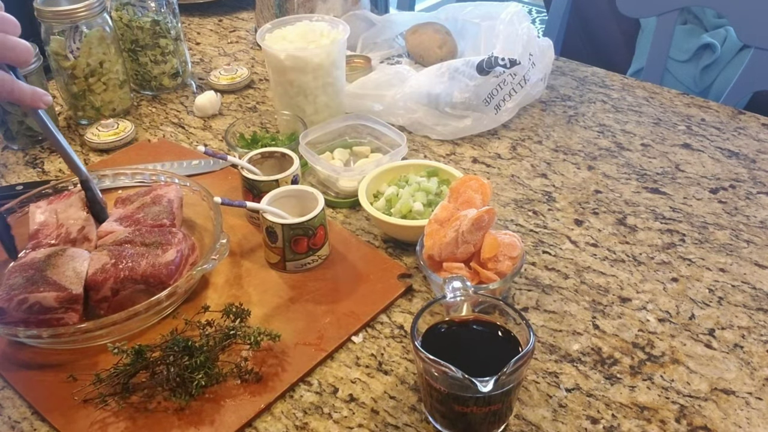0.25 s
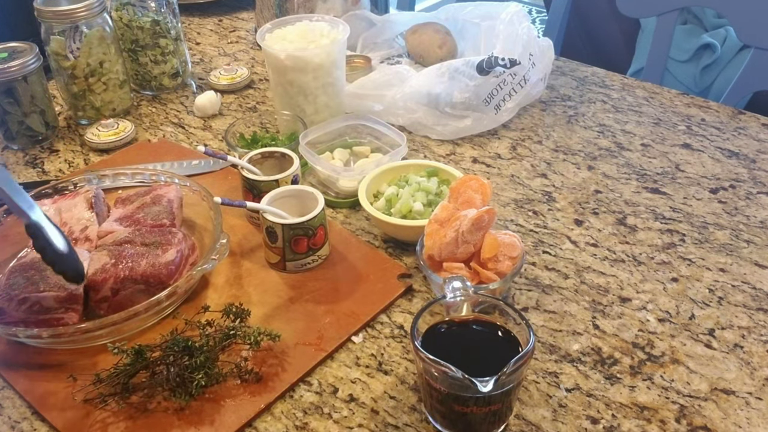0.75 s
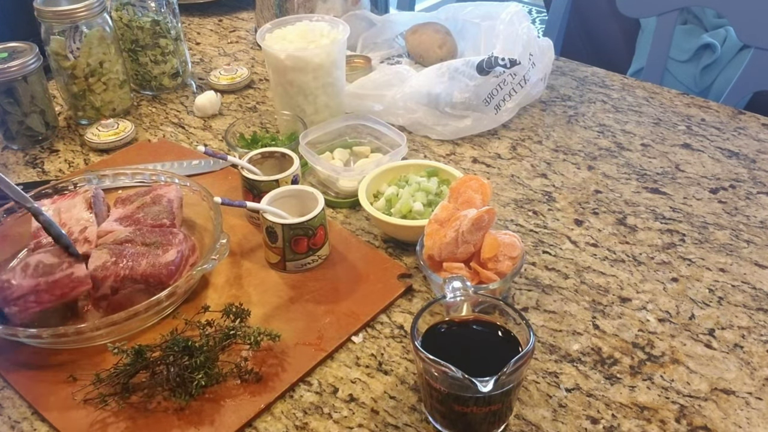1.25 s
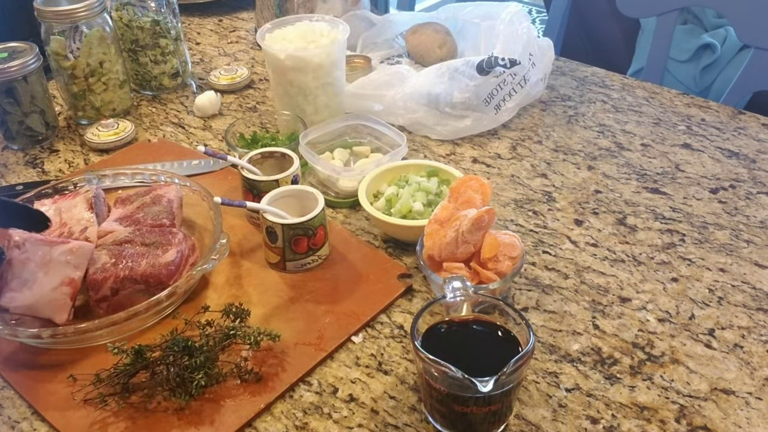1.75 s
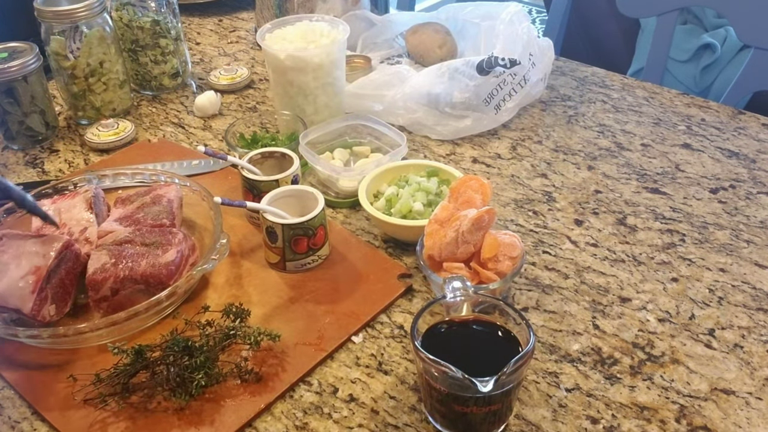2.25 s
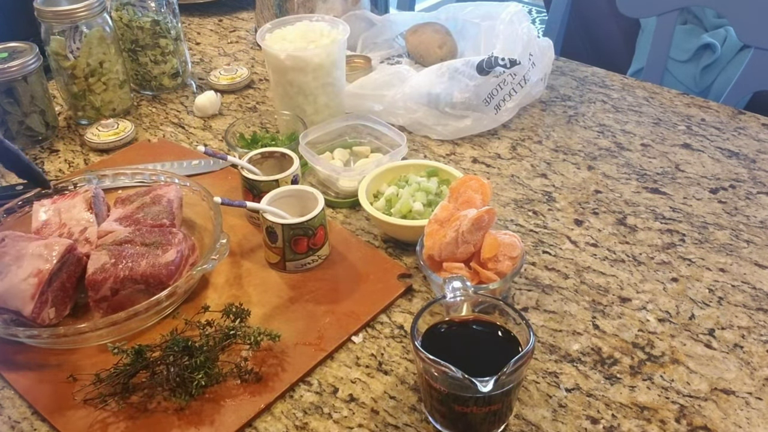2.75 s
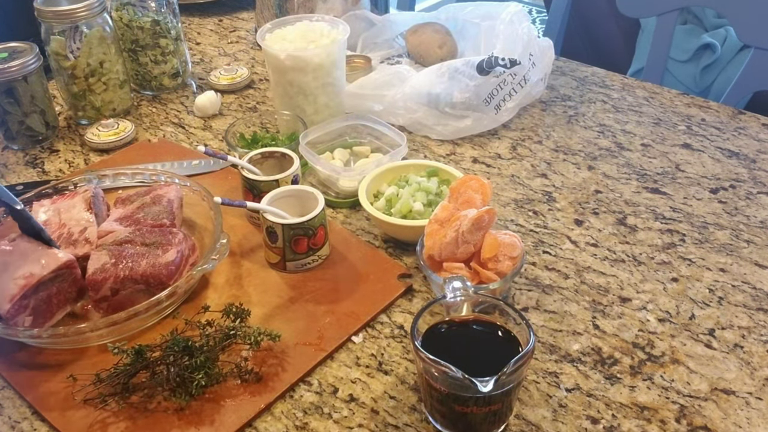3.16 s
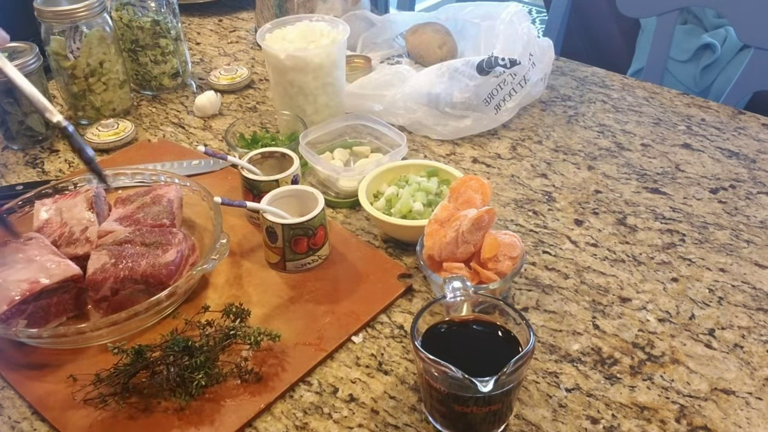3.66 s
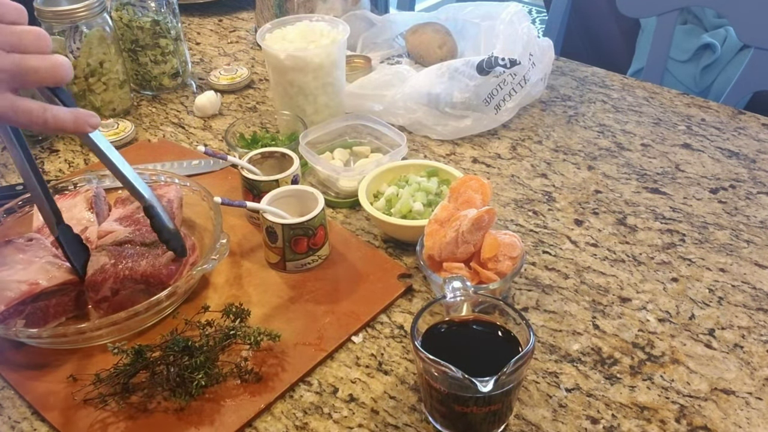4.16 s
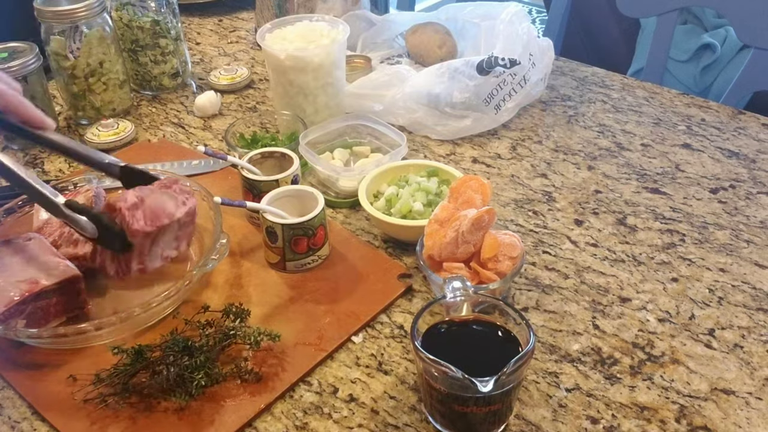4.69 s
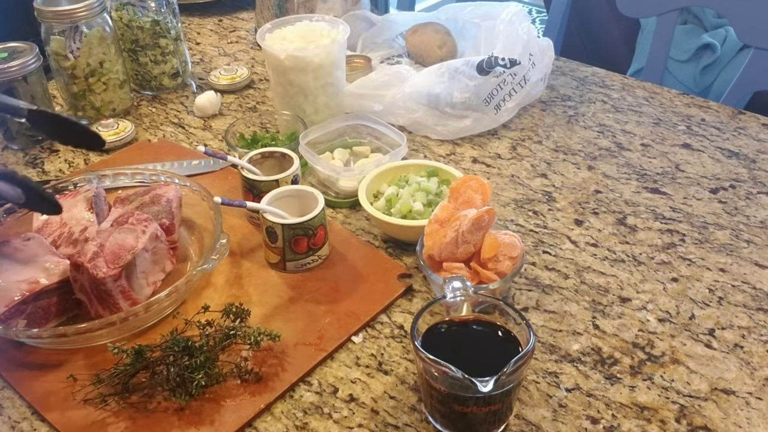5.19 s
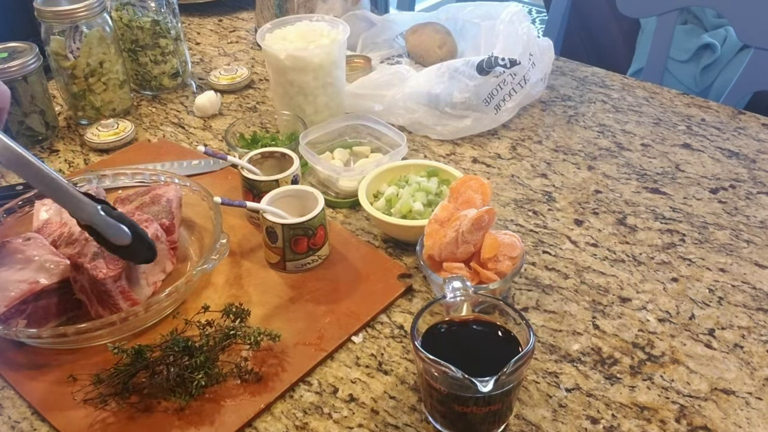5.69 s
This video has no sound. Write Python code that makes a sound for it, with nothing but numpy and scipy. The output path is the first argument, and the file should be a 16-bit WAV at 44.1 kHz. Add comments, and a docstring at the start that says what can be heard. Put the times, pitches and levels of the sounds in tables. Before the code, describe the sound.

A low room rumble with a faint wavering mains-like hum runs throughout, with slight hiss and a very faint, high, distant tick about five times a second. At 0.2 s meat settles softly. Around 0.8 s there is a muted tong touch on glass, a wet treble snap and a slap, then small sticky peels and clicks to 1.3 s. At 1.56 s steel tongs hit the glass bowl in a hard, loud double clack with a short ring. A lighter clink comes at 2.3 s, faint touches at 2.5 s, then three quick bright ringing blows from 2.92 to 2.98 s with board thuds. It stays mostly quiet until 4.35 s, when meat lands with a dull low thump and moist slap. Soft wet shifts follow at 4.7 to 4.9 s, a small wet snap at 5.27 s, and crisp smacks at 5.7 and 5.8 s. Short kitchen reverberation surrounds the close sounds.

```python
"""A low rumble with a wavering hum runs throughout, under a faint tick and meat being turned in a glass bowl.
The rumble is random spectra and the hum is sines; the tick and wet contacts are band-shaped puffs of noise.
Weight thuds on the board under the bowl as decaying low modes. Steel tongs clack in noise and short modes,
and their blows ring the glass in paired rim modes. Near echoes and a dying tail make the kitchen.
Two microphone ports, the right one reached later, colour the sound and add hiss."""
import sys
import numpy as np
from scipy import signal
from scipy.io import wavfile
from scipy.ndimage import uniform_filter1d

SR = 44100
rng = np.random.default_rng(int(sys.argv[2]) if len(sys.argv) > 2 else 0)


def inscribe(sig):
    """Save sig as 16-bit PCM at rate SR to the path in sys.argv[1].

    A 1-D sig is mono; a 2-D sig holds one channel per row.
    Samples are clipped to [-1, 1] before scaling.
    """
    pcm = np.round(np.clip(np.atleast_2d(sig).T, -1, 1) * 32767)
    wavfile.write(sys.argv[1], SR, pcm.astype(np.int16))


N = 261544
RIGHT_LAG = 8  # samples by which sound reaches the right port later


def gain_of(db):
    """Level definition: amplitude is ten to the power of dB / 20."""
    return 10 ** (np.asarray(db) / 20)


def evened(x):
    """Normalisation to unit root-mean-square."""
    return x / np.sqrt(np.mean(x ** 2) + 1e-20)


def read(points, hz, axis=1):
    """Interpolation along logarithmic frequency."""
    table = np.transpose(points)
    return np.interp(np.log(hz + 1), np.log(table[0] + 1), table[axis])


def lay(events):
    """Superposition: sounds, each with its start in s, add on one time line."""
    mix = np.zeros(N)
    for s, sound in events:
        part = mix[round(s * SR):][:len(sound)]
        part += sound[:len(part)]
    return mix


def colour(db):
    """Minimum phase: the causal filter whose phase follows from its gain, given in dB on 2049 bins."""
    both_sides = np.r_[db, db[-2:0:-1]]
    log_gain = np.log(gain_of(np.maximum(both_sides, -100)))
    spectrum = np.exp(np.conj(signal.hilbert(log_gain)))
    return np.fft.ifft(spectrum).real[:2048]


def ring(t, hz, db, t60):
    """Damped resonance: a sine falling 60 dB in t60 seconds."""
    return gain_of(db - 60 * t / t60) * np.sin(2 * np.pi * hz * t)


def knock(db, centre_hz, octaves, ms):
    """Contact noise: a gritty puff peaking after ms, in a band 6 dB down at `octaves` from its centre."""
    u = np.arange(9000) / SR / (max(ms, .2) / 1000)
    hz = np.fft.rfftfreq(4096, 1 / SR)
    grit = rng.standard_normal(9000) * gain_of(2.3 * (rng.exponential(1, 9000) - 2.5))
    distance = np.log2((hz + 30) / centre_hz) / max(octaves, .02)
    shape = colour(np.maximum(-6 * abs(distance) ** 2, -45))
    puff = grit * u * np.exp(1 - u)
    return gain_of(db) * signal.oaconvolve(puff, shape / np.linalg.norm(shape))


# likeness of left and right in a diffuse field: f/Hz, correlation
LIKENESS = [(60, 1), (180, 0.85), (350, 0.24), (700, 0.33), (1650, 0.017), (15000, 0.05)]
# appliance hum: f/Hz, level/dB before it wavers
HUM = [(120, -70.5), (240, -80), (360, -75)]
# spectrum of the room rumble before the ports: f/Hz, relative level/dB per Hz
RUMBLE = [(12, -45.5), (30, -12), (45, -6), (62, 0), (104, -2.5), (187, -18.5), (400, -16.5), (897, -27),
          (3950, -34), (6300, -32), (16000, -27.5)]
RUMBLE_DB = -58  # before the ports
PATCH_DB, WAVER_DB = 1.6, 4.8  # rms swing of the rumble's patches and of the hum


def rumble():
    """Partly coherent noise: random short-time spectra with drifting patches, plus wavering hum tones."""
    frames, hz, t = N // 512 + 5, np.fft.rfftfreq(2048, 1 / SR), np.arange(N) / SR
    a, b, c, d, patches = rng.standard_normal((frames, 1025, 5)).T
    patches = evened(uniform_filter1d(uniform_filter1d(patches, 12, 0), 8, 1))
    same = np.clip(read(LIKENESS, hz), -1, 1)[:, None]
    left = a + 1j * b
    right = same * left + np.sqrt(1 - same ** 2) * (c + 1j * d)
    z = np.array([left, right]) * gain_of(read(RUMBLE, hz)[:, None] + PATCH_DB * patches)
    noise = signal.istft(z, nperseg=2048, noverlap=1536)[1][:, :N]
    drift = rng.standard_normal((len(HUM), N))
    waver = evened(uniform_filter1d(uniform_filter1d(drift, 5000), 5000))
    hum = sum(gain_of(db + WAVER_DB * w) * np.sin(2 * np.pi * f * t) for (f, db), w in zip(HUM, waver))
    return gain_of(RUMBLE_DB) * evened(noise) + hum


# decay of the kitchen: f/Hz, t60/s
DECAY = [(125, 0.52), (500, 0.38), (2000, 0.47), (6000, 0.45), (9000, .34), (12000, 0.47), (16000, 0.38)]
# near echoes: t/ms, left level/dB, right level/dB
ECHOES = [(2.578, -8, -13), (6.512, -10.5, -4), (10.925, -5.5, 0.5), (14.96, -8, -11.5), (22.93, -9, -18)]


def kitchen(x):
    """Reverberation: direct sound, a few near echoes, and a tail of sparse impulses dying band by band."""
    impulses = np.zeros((2, SR))
    at = np.arange(200, SR - 20, 20) + rng.integers(0, 20, (2, (SR - 201) // 20))
    np.put_along_axis(impulses, at, rng.choice([-1., 1.], at.shape), 1)
    hz, t, z = signal.stft(impulses, SR, nperseg=256)
    same = np.clip(read(LIKENESS, hz), 0, 1)[:, None]  # bass echoes are alike at both ports
    z[1] = same * z[0] + np.sqrt(1 - same ** 2) * z[1]
    dying = z * gain_of(-60 * t / read(DECAY, hz)[:, None])
    response = signal.istft(dying, SR, nperseg=256)[1]
    response *= gain_of([[4], [6]]) / np.linalg.norm(response[0])
    response[0, 0] += 1  # direct sound
    response[1, RIGHT_LAG] += 1
    for ms, *db in ECHOES:
        response[:, round(ms / 1000 * SR)] += gain_of(db)
    return signal.fftconvolve(x[None], response, axes=1)[:, :N]


TICK_START_S, TICK_PERIOD_S = .134, .1913
TICK_DB, TICK_SPREAD_DB = -69.5, 5.5  # mean and random spread


def ticks():
    """Periodicity: a faint far tick at a steady interval, each a narrow puff of uneven level."""
    beats = TICK_START_S + TICK_PERIOD_S * np.arange(30)
    return lay((s, knock(TICK_DB + TICK_SPREAD_DB * rng.standard_normal(), 6300, .3, 9)) for s in beats)


# meat peeling off glass: t/s, level/dB, contact/ms
PEELS = [(0.107, -59.5, 39), (0.831, -41.5, 4.9), (1.068, -56, 4.4), (1.33, -50.5, 8.7), (3.328, -63, 19.5),
         (4.36, -45.5, 16), (4.479, -60, 17), (4.761, -57.5, 47), (4.9, -64, 49), (5.28, -52, 11)]


def peels():
    """Adhesion giving way: a soft treble hiss lasts as long as the peeling contact."""
    return lay((s, knock(db, 14000, 1, ms)) for s, db, ms in PEELS)


# tiny wet snaps as meat lets go: t/s, level/dB
SNAPS = [(.826, -27), (.854, -47.5), (1.249, -40.5), (1.277, -43.5), (1.315, -39), (5.2656, -30.5)]


def snaps():
    """Sudden release: a sub-millisecond rise in a narrow treble band."""
    return lay((s, knock(db, 14200, .3, .6)) for s, db in SNAPS)


# slaps of meat on meat and glass: t/s, level/dB, centre f/Hz, contact/ms
SLAPS = [(.205, -48, 4750, 2.4), (.849, -40.5, 2330, 10.8), (3.647, -59, 5040, 6.3),
         (4.34, -40.5, 5020, 8.4), (4.392, -46.5, 9400, 4.3), (4.741, -51, 9000, 3.1),
         (4.852, -52, 7000, 3.3), (5.663, -49.5, 6380, 2.1), (5.708, -33, 4000, 0.53),
         (5.728, -42.5, 5580, 1.1), (5.802, -38.5, 6000, 13), (5.819, -29.5, 3930, 3.5)]


def slaps():
    """Soft impact: yielding meat spreads its noise over a broad band."""
    return lay((s, knock(db, hz, 3.36, ms)) for s, db, hz, ms in SLAPS)


# narrow-band knocks, some sounding together: t/s, level/dB, centre f/Hz, width/octaves, contact/ms
NARROW_KNOCKS = [(1.323, -52, 5000, .05, 8), (1.324, -56.5, 1150, .3, 3.1), (1.326, -48, 6500, .2, 6),
                 (4.349, -36.5, 1500, .21, 2.9), (4.353, -37, 2300, .22, 2.2),
                 (5.113, -61.5, 5500, .53, 12.5), (5.264, -43.5, 5680, .6, 3), (5.3, -60, 5990, .6, 19),
                 (5.71, -48.5, 613, .45, 4.3), (5.717, -27.5, 4730, .75, .4), (5.822, -44, 2400, .2, 4),
                 (5.841, -48, 1010, .17, 6.1)]


def narrow_knocks():
    """Band-limited noise: narrow-band knocks, some sounding together as one dull contact."""
    return lay((s, knock(*how)) for s, *how in NARROW_KNOCKS)


# modes of the board under the bowl: f/Hz, level/dB, t60/s
BOARD = [(95.07, -4.5, 0.11), (149, -1.5, 0.046), (218, -8, 0.066), (393, -6.5, 0.077), (583, -1, .05)]
# weight landing on the board: t/s, level/dB, favoured f/Hz
THUDS = [(0.206, -53.5, 150), (.826, -45.5, 300), (.854, -46.5, 300), (1.557, -50, 230), (1.571, -44, 210),
         (2.9495, -46.5, 260), (2.9851, -42, 250), (4.35, -35.5, 130), (4.391, -44.5, 101),
         (4.742, -57.5, 400), (5.114, -62, 99.8), (5.713, -52.5, 199), (5.82, -48.5, 119)]
THUD_FOCUS_DB = 5.5  # fall per octave away from the favoured pitch


def thuds():
    """Modal excitation: landing weight drives most strongly the board modes near its favoured pitch."""
    t = np.arange(9000) / SR
    onset = np.minimum(t / 0.0011, 1)
    events = []
    for s, db, pitch_hz in THUDS:
        modes = sum(ring(t, hz, d - THUD_FOCUS_DB * abs(np.log2(hz / pitch_hz)), t60)
                    for hz, d, t60 in BOARD)
        events.append((s, gain_of(db) * onset * modes))
    return lay(events)


# modes of the tongs: f/Hz, level/dB, t60/s
TONGS = [(840, -10, .03), (1080, -3, .022), (2230, -7, .04), (3030, -14, .04), (3130, -9, .07),
         (3250, -8, .07), (3500, -12, .04), (4490, -16, .06), (4700, -14, .08), (5700, -11, .04),
         (6200, -3, .075), (6320, -12, .05), (6467, -13, .06), (7442, -10, .09), (7780, -13, .12),
         (8590, -21, .07), (9730, -18, .06), (11200, -18, .05)]


def clack(t, db, chatter, tongs_db):
    """Impact and resonance: decaying chatter noise with a first snap, and the ringing steel."""
    crack = gain_of(db - 60 * t / max(chatter, .005)) * np.minimum(t / 0.0015, 1)
    crack *= rng.standard_normal(len(t))
    crack[:40] += gain_of(db + 9) * ring(t[:40], 4500, 0, 0.0008)  # first touch snaps
    return crack + gain_of(tongs_db) * sum(ring(t, *mode) for mode in TONGS)


# pairs of rim modes: f/Hz, partner f/Hz, waves around the rim
BOWL = [(743, 630, 4), (1340, 1394, 4), (2275, 2242, 2), (3359, 3302, 3), (4655, 4495, 7), (4770, 4436, 7),
        (5857, 5921, 1), (6640, 6126, 6), (7765, 7444, 4), (9170, 9243, 5), (11370, 11500, 5)]
# how each pair rings: level/dB, t60/s
BOWL_RING = [(-4.5, 0.13), (2.5, .24), (-3, .27), (2.5, 0.3), (-6, .3), (-16.5, .2), (-6.5, 0.28),
             (-10.5, .14), (-10, 0.19), (-20, .13), (-22, .13)]


def bowl_ring(t, place):
    """Split degenerate modes: the two of a pair share the blow by where on the rim it lands."""
    return sum(np.cos(m * place) * ring(t, a, *how) + np.sin(m * place) * ring(t, b, *how)
               for (a, b, m), how in zip(BOWL, BOWL_RING))


def hardness_filter(tilt_db):
    """Contact stiffness: a harder blow tilts the spectrum upward, in dB per octave."""
    hz = np.fft.rfftfreq(4096, 1 / SR)
    tilt = tilt_db * np.log2((hz + 100) / 4000)
    tilt -= 12 * np.log2(1 + (650 / (hz + 30)) ** 2)  # bass roll-off
    tilt -= 4 * np.log2(1 + (hz / 11000) ** 2)  # treble roll-off
    return colour(np.clip(tilt, -60, 20))


# steel on glass, levels before the hardness filter: t/s, crack level/dB, hardness tilt/(dB per octave),
# chatter t60/s, bowl level/dB, place on the rim/rad, tongs level/dB
CLINKS = [(.792, -35.5, -2.5, .12, -39.5, 0.15, -79), (1.558, -6.5, -0.54, .04, -33, 0.15, -15),
          (1.572, -18.5, 0, .05, -38, 0.37, -16), (2.3319, -25.5, 0.7, .06, -36.5, 0.063, -33.5),
          (2.49, -55, -4, .05, -52.5, 0.2, -55.5), (2.521, -44, -1.5, .05, -53.5, 0.1, -60.5),
          (2.924, -24.5, 3.5, 0.054, -27, 0.35, -33), (2.9503, -21.5, 1, .06, -23, 0.2, -37.5),
          (2.9844, -11, -2.04, 0.023, -31.5, 0.098, -45.5), (3.485, -57, -2.5, .08, -68, 0.06, -79)]


def clinks():
    """Coupled impact: one blow sounds both bodies; returns the steel and the glass separately."""
    t = np.arange(16000) / SR
    steel, glass = [], []
    for s, db, tilt_db, chatter, bowl_db, place, tongs_db in CLINKS:
        hardness = hardness_filter(tilt_db)
        steel.append((s, signal.oaconvolve(clack(t, db, chatter, tongs_db), hardness)))
        glass.append((s, signal.oaconvolve(gain_of(bowl_db) * bowl_ring(t, place), hardness)))
    return lay(steel), lay(glass)


GLASS_LEFT_DB, GLASS_RIGHT_DB, GLASS_ROOM_DB = 3, 2, -8  # the bowl's ring at each port, and into the room


def scene():
    """Superposition of the direct glass and board, all sources through the kitchen, and the rumble."""
    steel, glass = clinks()
    board = thuds()
    near = steel + ticks() + peels() + snaps() + slaps() + narrow_knocks()
    direct = np.array([gain_of(GLASS_LEFT_DB) * glass, gain_of(GLASS_RIGHT_DB) * np.roll(glass, RIGHT_LAG)])
    into_room = near + gain_of(GLASS_ROOM_DB) * glass + 1.9 * board
    # long bass waves reach both ports alike, so the board is added equally
    return kitchen(into_room) + direct + board + rumble()


# colour of each port, the left cavity peaks near 6 and 13 kHz: f/Hz, left level/dB, right level/dB
PORTS = [(25.8, -15, -9.5), (56, -6.5, -7.5), (295, -2, -3.5), (1525, -7.5, -13), (3350, -4.5, -9.5),
         (5050, 0, -10), (6440, 6, -18), (6930, -1.5, -14.5), (8420, -16.5, -11.5), (10160, -11.5, -17),
         (12600, -6.5, -16), (15700, -5, -28)]
# each microphone's own noise before the band limit: level/dB, left row then right row
HISS_DB = [
    [-82.5],
    [-77],
]
EDGE_HZ = 15900


def record(dry):
    """Linear filtering: each port colours the sound and adds its hiss; then the band limit."""
    hz = np.fft.rfftfreq(4096, 1 / SR)
    ports = np.array([colour(read(PORTS, hz, axis=k)) for k in (1, 2)])
    heard = signal.oaconvolve(dry, ports, axes=1)[:, :N]
    heard = heard + gain_of(HISS_DB) * rng.standard_normal((2, N))
    band_limit = signal.firwin(255, EDGE_HZ, window=("kaiser", 9), fs=SR)
    return signal.oaconvolve(heard, band_limit[None], "same", axes=1)


dry = scene()
out = record(dry)
inscribe(out)
```